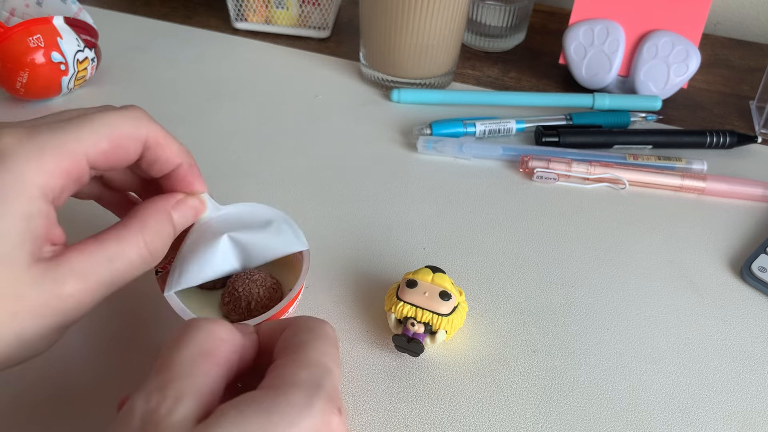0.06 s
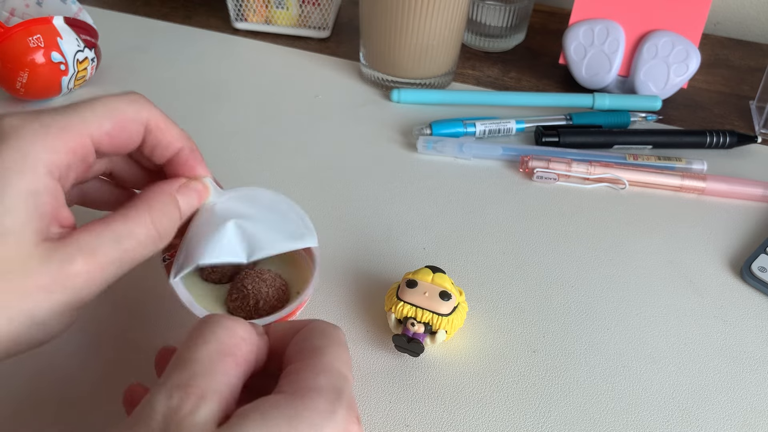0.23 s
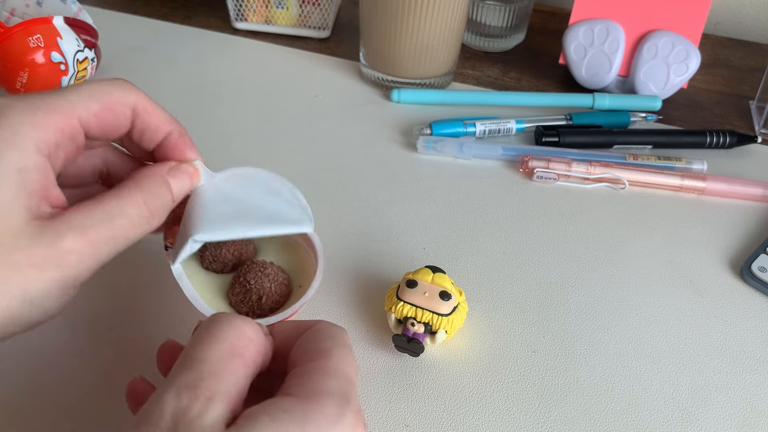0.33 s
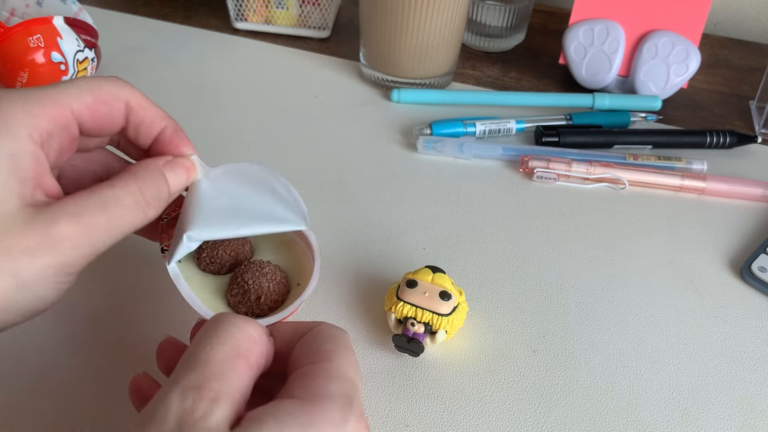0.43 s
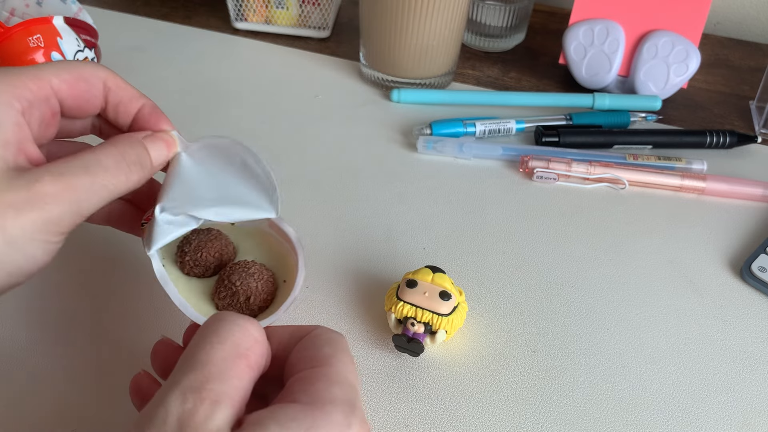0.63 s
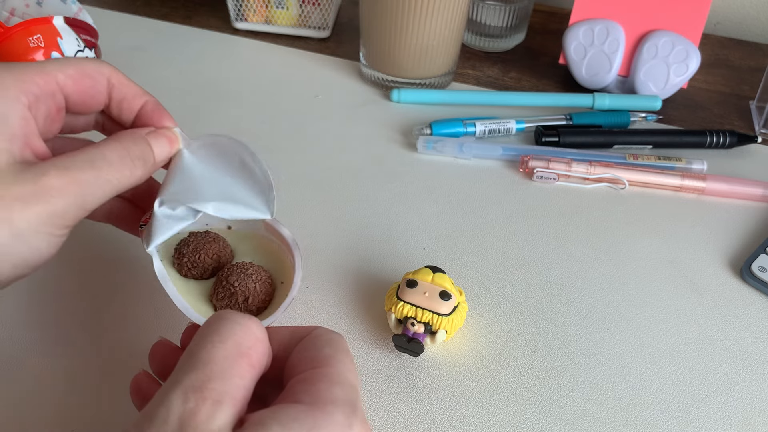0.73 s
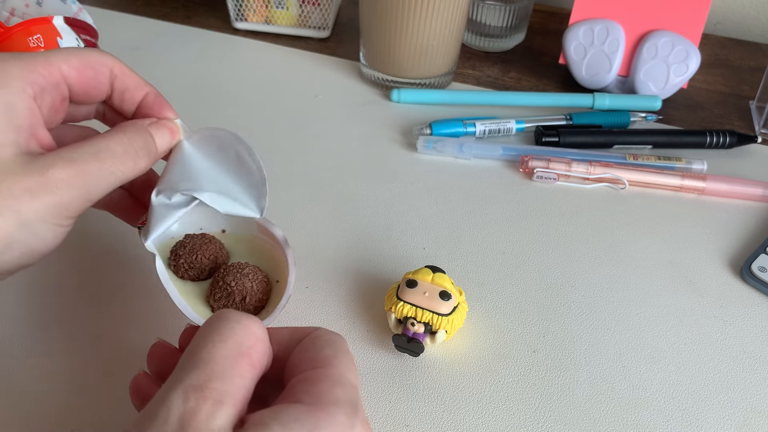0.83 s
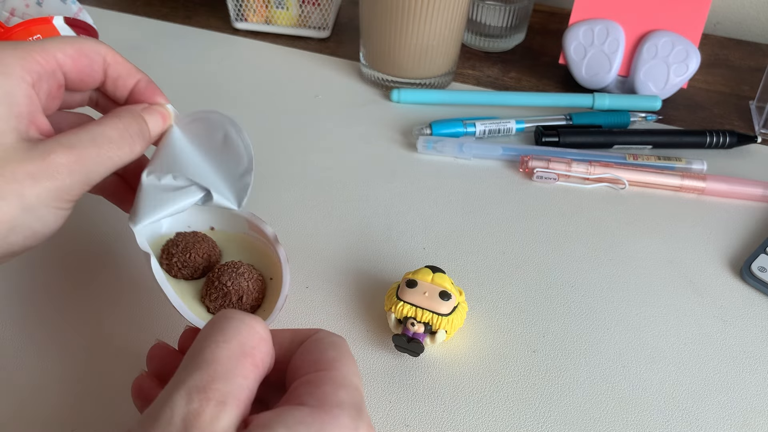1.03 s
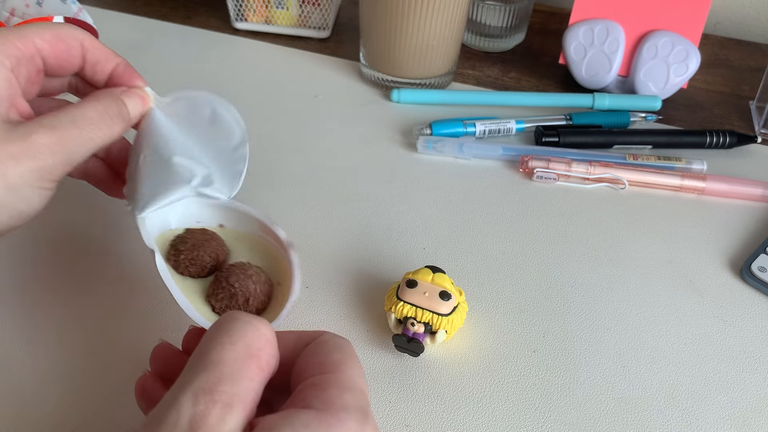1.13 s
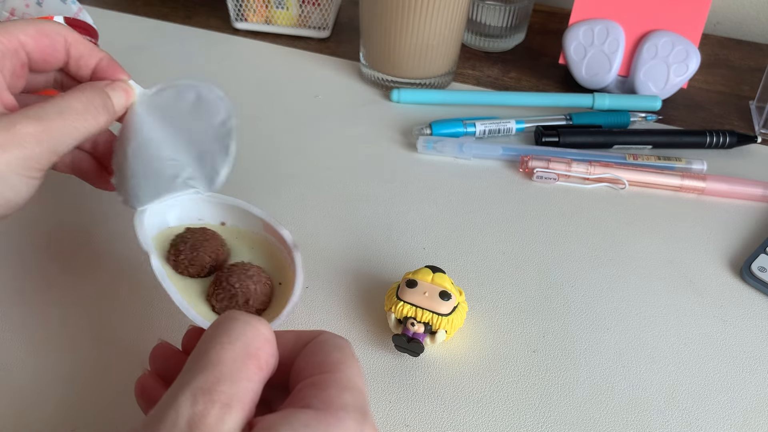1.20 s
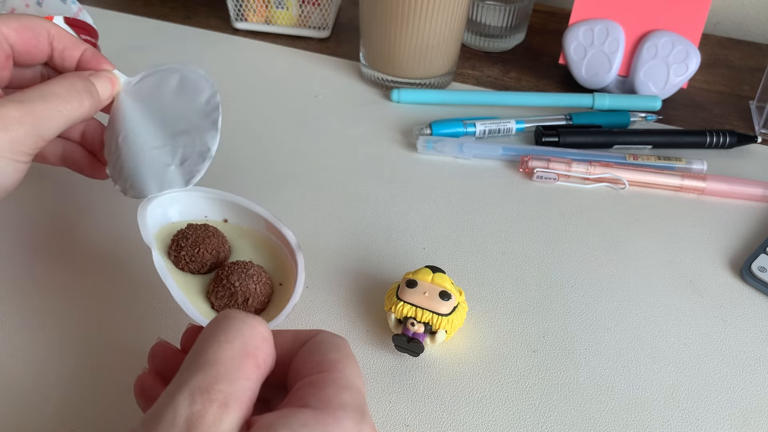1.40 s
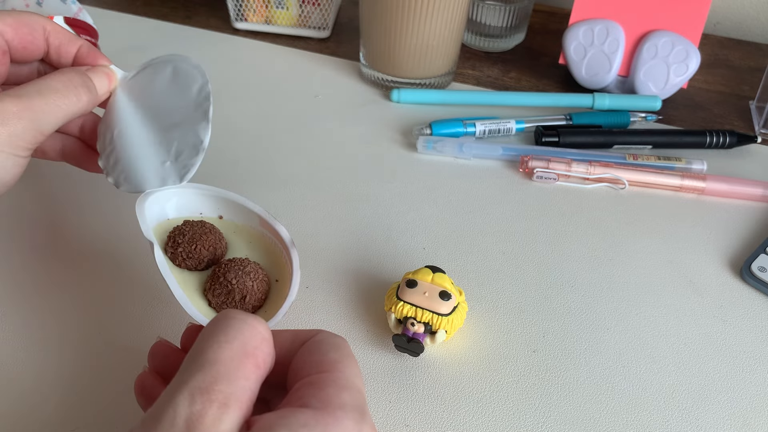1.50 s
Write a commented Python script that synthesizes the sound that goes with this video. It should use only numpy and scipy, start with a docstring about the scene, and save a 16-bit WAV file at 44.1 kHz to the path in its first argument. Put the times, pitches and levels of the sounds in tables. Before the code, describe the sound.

Foil seal being peeled from a little plastic cup, crinkling and popping loudly, close up indoors

```python
"""A foil lid is peeled off a small plastic cup, close by, at a desk in a small room.
The foil buckles in sharp snaps: noise cracks, each with a short shiver, that set the decaying sines of the rim
and of flipping facets ringing. Between them the seal lets go with a fine crackle of random grains, and filtered
noise makes the rub of the fingers and the sliding foil. Echoes and a diffuse tail place it in the room, which
hums quietly, and the loudest snaps overload the microphone."""
import sys
import numpy as np
from scipy import signal
from scipy.io import wavfile
from scipy.ndimage import uniform_filter1d, map_coordinates

SR = 44100
rng = np.random.default_rng(int(sys.argv[2]) if len(sys.argv) > 2 else 0)


def transcribe(u):
    """Save the signal u as a 16-bit wav file named by the first command-line argument.

    u: samples, shape (n,) or (channels, n), limited to [-1, 1]; the rate is SR.
    q: integer samples, one column per channel.
    """
    v = np.clip(np.atleast_2d(u).T, -1, 1)
    q = np.round(v * 32767).astype(np.int16)
    wavfile.write(sys.argv[1], SR, q)


N = 68355
TIME = np.arange(N) / SR
# analysis bands, evenly spaced in log frequency: low_hz, centre_hz, high_hz
EDGES = np.geomspace(22, 17000, 25)
BANDS = list(zip(EDGES, np.sqrt(EDGES[1:] * EDGES[:-1]), EDGES[1:]))


def from_db(db):
    """Decibel law: 20 dB is a factor of ten in amplitude."""
    return 10 ** (np.asarray(db) / 20)


def rms_one(x):
    """Power normalisation: scale to rms 1."""
    return x / np.sqrt(np.mean(x ** 2) + 1e-20)


def unit_energy(x):
    """Energy normalisation: scale each channel to the energy of a unit click."""
    return x / np.sqrt(np.sum(x ** 2, axis=-1, keepdims=True) + 1e-20)


def at_hz(points, hz, column=1):
    """Logarithmic pitch scale: interpolate a table column along log frequency."""
    rows = np.array(points)
    return np.interp(np.log(hz), np.log(rows[:, 0]), rows[:, column])


def level(curve):
    """Amplitude envelope: gain over time from points of time_s, level_db."""
    return from_db(np.interp(TIME, *np.transpose(curve)))


def band(x, low, high):
    """Causal band-pass filtering."""
    sos = signal.butter(2, [low, high], "band", fs=SR, output="sos")
    return signal.sosfilt(sos, x + 1e-18)


def pair(two, likeness):
    """Interchannel correlation: mix two unrelated signals to a left and right of given likeness."""
    c = np.clip(likeness, -1, 1)
    mid = np.sqrt((1 + c) / 2) * two[0]
    side = np.sqrt((1 - c) / 2) * two[1]
    return np.array([mid + side, mid - side])


def pan(db):
    """Interaural level difference: gains for a left channel db above the right."""
    return from_db(np.array([[db / 2], [-db / 2]]))


def late(x, s):
    """Propagation delay: shift by a time in seconds, to a fraction of a sample."""
    return map_coordinates(x, [(TIME - s) * SR], order=3)


def drift(rate):
    """Random modulation: a smooth curve through rate random knots per second, of spread about 1."""
    knots = rng.standard_normal(200)
    return map_coordinates(knots, [TIME * rate], order=3, mode="wrap")


def add(out, sound, s):
    """Superposition: mix a sound in from a time in seconds."""
    i = max(int(s * SR), 0)
    out[..., i:i + sound.shape[-1]] += sound[..., :N - i]


def ring(hz, t60):
    """Damped free vibration: a sine that falls 60 dB in t60 seconds."""
    return np.sin(2 * np.pi * hz * TIME) * from_db(-60 * TIME / t60)


def coloured(sources, colour, likeness):
    """Subtractive synthesis: stereo noise of rms 1, shaped band by band."""
    total = 0
    for k, (low, hz, high) in enumerate(BANDS):
        if high > colour[0][0]:
            # neighbouring bands take unrelated sources
            stereo = pair(band(sources[k % 2], low, high), at_hz(likeness, hz))
            total = total + from_db(at_hz(colour, hz)) * stereo
    return rms_one(total)


# spectrum of the room air: pitch_hz, relative level_db
AIR = [(30, -37), (60, -12), (90, -10.5), (140, -3.5), (200, -12.5), (310, -8), (550, -20), (800, -20),
       (1600, -40), (4000, -33), (9000, -39), (16000, -73)]
# left-right correlation of diffuse noise: pitch_hz, likeness (no unit)
AIR_LIKENESS = [(50, 0.79), (130, 0.63), (400, 0.31), (1200, 0.067), (8000, 0.063)]
# spectrum of the rumble: pitch_hz, relative level_db
RUMBLE = [(25, -32), (38, -11), (52, 3), (75, -2.5), (120, -21), (300, -51)]
# low and upper hum tones: pitch_hz, level_db, waver_db
HUM = [(52, -38, 2.5), (98.7, -46, 0)]
# swell and sinking of the rumble and the low hum: time_s, gain_db
DRONE = [(0, 7), (.12, -9.5), (.25, -3), (.37, 3), (.47, -18.5), (.57, -1.5), (.65, -10), (.75, 2.5),
         (.88, -2.5), (.96, -8), (1.06, 1), (1.2, 1.5), (1.3, 7.5), (1.38, 1), (1.55, 1.5)]
AIR_DB, RUMBLE_DB, HUM_WANDER_HZ = -40.5, -42, 2.37


def background():
    """Stationary noise and modulated tones: room air, with a low hum and rumble that swell and sink."""
    air = from_db(AIR_DB) * coloured(rng.standard_normal((2, 2, N)), AIR, AIR_LIKENESS)
    rumble = from_db(RUMBLE_DB) * coloured(rng.standard_normal((2, 2, N)), RUMBLE, AIR_LIKENESS)
    tones = []
    for hz, db, waver_db in HUM:
        gain = from_db(db + waver_db * drift(9.3))
        phase = 2 * np.pi * np.cumsum(hz + HUM_WANDER_HZ * drift(8)) / SR
        tones.append(gain * np.sqrt(2) * np.sin(phase))
    low_hum, upper_hum = tones
    return air + level(DRONE) * (rumble + low_hum) + upper_hum


# fingers rubbing on the cup and the foil: time_s, level_db
RUB = [(0, -35), (.10, -45), (.2, -43), (.45, -47), (.57, -38.5), (.66, -44), (.78, -42), (.86, -39),
       (.95, -40.5), (1.1, -36.5), (1.3, -46), (1.55, -39)]
# spectrum of the rub: pitch_hz, relative level_db
RUB_COLOUR = [(200, -4.5), (500, 0), (780, 0.5), (1000, 5.5), (1300, -2), (1800, -7.5), (3000, -12),
              (8000, -29)]


def rub():
    """Friction noise: the soft rub of the fingers as enveloped, coloured noise."""
    return level(RUB) * coloured(rng.standard_normal((2, 2, N)), RUB_COLOUR, AIR_LIKENESS)


# the foil slides briefly over the rim: centre_s, length_s, pitch_hz, width_hz, level_db
SLIDES = [(0.565, 0.2, 750, 130, -39), (0.846, 0.14, 1250, 310, -41), (0.918, 0.062, 4200, 690, -38.5),
          (0.013, 0.076, 2800, 730, -44)]
SLIDE_LIKENESS = 0.6


def slides():
    """Resonant friction: short swells of noise, each in one band."""
    out = np.zeros((2, N))
    for centre_s, length_s, hz, width_hz, db in SLIDES:
        swell = np.cos(np.pi * np.clip((TIME - centre_s) / length_s, -.5, .5))
        noise = pair(rng.standard_normal((2, N)), SLIDE_LIKENESS)
        hiss = band(noise, hz - width_hz / 2, hz + width_hz / 2)
        out += from_db(db) * swell * rms_one(hiss)
    return out


# crackle of the seal letting go: time_s, level_db
PEEL = [(0, -37), (.06, -42), (.11, -69), (.16, -47), (.22, -67), (.30, -33.5), (.37, -51), (.45, -44),
        (.51, -38), (.575, -30), (.63, -37), (.70, -53.5), (.80, -43.5), (.92, -37.5), (.99, -39),
        (1.10, -32.5), (1.22, -33), (1.30, -40), (1.36, -75), (1.55, -51.5)]
# spectrum of the crackle: pitch_hz, relative level_db
PEEL_COLOUR = [(500, -3.5), (1200, -17), (2000, 1.5), (3000, 2.5), (4300, -1), (7000, -2), (9000, 2.5),
               (11000, -7), (15000, -11.5)]
GRAINS_PER_S, GRAIN_SPREAD_DB, PEEL_LIKENESS = 3500, 0.5, 0.63


def peel():
    """Granular fracture noise: thousands of tiny breaks of uneven size run along the seal."""
    sizes = from_db(GRAIN_SPREAD_DB * np.minimum(rng.exponential(1, N), 5))
    breaks = rng.random(N) < GRAINS_PER_S / SR
    grains = sizes * breaks * rng.standard_normal((2, 2, N))
    return level(PEEL) * coloured(grains, PEEL_COLOUR, [(1000, PEEL_LIKENESS)])


# modes of the cup's rim: pitch_hz, level_db, t60_s
RIM = [(2360, -25, 0.058), (2458, -15, 0.053), (2619, -8, 0.099), (2674, -21, 0.17), (2810, -16.5, 0.11),
       (3020, -33, 0.15), (4220, -37, .15)]
RIM_PAN_DB, RIM_LAG_S = 0.5, 0.00009  # left above right, right after left


def rim():
    """Modal excitation: each snap sets the rim's damped modes ringing at its own level."""
    modes = sum(from_db(db) * ring(hz, t60) for hz, db, t60 in RIM)
    out = np.zeros(N)
    for s, *_, rim_db in SNAPS:
        add(out, from_db(rim_db) * modes, s)
    return pan(RIM_PAN_DB) * np.array([out, late(out, RIM_LAG_S)])


# a facet of the lid flips and rings briefly: start_s, pitch_hz, level_db, t60_s
POPS = [(0.136, 1190, -19, 0.012), (.2508, 720, -11, 0.027), (0.2529, 523, -18.5, .022),
        (0.3121, 434, -10.5, 0.049), (0.3186, 2830, -6, 0.057), (.3190, 1390, -15.5, 0.033),
        (.5253, 3160, -22.5, 0.02), (0.5823, 3790, -13, 0.017), (0.663, 5170, -22.5, .01),
        (1.0515, 720, -8.5, 0.025), (1.0525, 1136, -18, .025), (1.1245, 1350, -15, 0.037),
        (1.1453, 3320, -13, 0.02), (1.1608, 1369, -15.5, 0.053), (1.1914, 5560, -10, 0.026),
        (1.3035, 1387, -29.5, .035), (1.496, 1414, -35, 0.049)]
POP_PAN_DB = 4.5


def pops():
    """Damped resonance: a flipping facet of the lid rings briefly, and the low ones sound hollow."""
    out = np.zeros(N)
    for s, hz, db, t60 in POPS:
        add(out, from_db(db) * ring(hz, t60), s)
    return out * pan(POP_PAN_DB)


# the foil snaps: start_s, four band levels_db (at the pitches of SNAP_HZ),
# shiver relative to the crack_db, rim ring_db
SNAPS = [(.0482, -12, -9, -4.5, -6.5, -12, -70), (0.1354, -4, 6.5, 8, -3, -5, -60),
         (0.1794, -13, 2.5, 0, -22, 11, -16), (0.2405, -11, 11.5, 10, 15, -3, -1.5),
         (0.2435, -34, 12, 19.5, -9, 18, -11), (.2495, 13, 4, 5, -8, -3, -21),
         (0.3118, 15.5, 19, 15.5, 26.5, -2.5, 0), (0.3163, 8.5, 20.5, 27, 8, 20, -25),
         (0.3231, -11, 13, 19, -17, 13, -2.5), (0.3358, -5, 9, 9, 6, 17, -44),
         (0.5247, 7, 4.5, 2, 11.5, -2.5, -28), (0.5655, 5.5, -13, 3, 2, 0, -60),
         (0.5821, 9, 0, 9.5, 10.5, -1, -50), (0.6637, 3, -2, 5, -2, -2.5, -27.5),
         (0.7744, -7, -11, -10, -7.5, 15, -59), (1.0296, -12, 12, 18.5, 19, -13, -46),
         (1.0509, 7, 20.5, 23.5, 21.5, -3, -41), (1.126, 17.5, 17, 9.5, -1, -4, -12),
         (1.141, -8, -11, 20, -7, 5, -50), (1.1446, 13, 10, 29, 18, -1.5, -31),
         (1.1497, -18, 7, 25.5, 21.5, 0, -35), (1.1610, 10.5, 18.5, 16.5, 10.5, -0.5, -35),
         (1.19, -3, 19, 16.5, 26, -2, -30), (1.1955, 3, -5, 14, 7, 0, -26),
         (1.235, 5, 11.5, 8.5, 26, 14, -17), (1.2494, -11, -13, -4, 13, -2, -63),
         (1.304, 8, 12.5, 4.5, 3, 0.5, -36), (1.4961, 0, 3.5, 2, -48, 20, -31.5)]
# where the four band levels of a snap apply: pitch_hz
SNAP_HZ = (600, 1400, 3500, 9000)
# stereo balance of the snaps: pitch_hz, left minus right_db
BALANCE_DB = [(250, -1), (700, 5.5), (1400, -0.5), (2700, 3.5), (5000, -6), (9000, -1), (15000, -2)]
BASS_DB_PER_OCT, TOP_DB_PER_OCT = -2.5, -15  # slopes below and above SNAP_HZ
CRACK_S, SHIVER_S = 0.00047, 0.0068  # time constants of the decay
SNAP_LIKENESS, SHIVER_LIKENESS = 0.97, 0.56
SHIVER_ROUGH_DB = 5.0
SHIVER_GRAIN_S = 0.0011  # the shiver is a run of tiny after-cracks this long


def snaps():
    """Impulsive buckling: a crack with a sub-millisecond decay and a short shiver, each snap coloured."""
    rows, t = np.array(SNAPS), TIME[:SR // 20]
    # axes: alternate bands, four sources, snaps, time
    white = rng.standard_normal((len(rows), 2, 4, len(t))).transpose(1, 2, 0, 3)
    lumps = uniform_filter1d(rng.standard_normal((len(rows), len(t))), max(int(SHIVER_GRAIN_S * SR), 1))
    ragged = from_db(SHIVER_ROUGH_DB * rms_one(lumps)) * np.exp(-t / SHIVER_S)
    sounds = 0
    for k, (low, hz, high) in enumerate(BANDS):
        if hz < 200:
            continue
        crack = band(pair(white[k % 2, :2], SNAP_LIKENESS) * np.exp(-t / CRACK_S), low, high)
        shiver = band(pair(white[k % 2, 2:], SHIVER_LIKENESS) * ragged, low, high)
        burst = unit_energy(unit_energy(crack) + from_db(rows[:, 5:6]) * unit_energy(shiver))
        db = np.array([np.interp(np.log(hz), np.log(SNAP_HZ), row[1:5]) for row in rows])
        db = db + BASS_DB_PER_OCT * max(np.log2(SNAP_HZ[0] / hz), 0)
        db = db + TOP_DB_PER_OCT * max(np.log2(hz / SNAP_HZ[-1]), 0)
        click_share = np.sqrt(2 * (high - low) / SR)  # a flat click's amplitude in this band
        balance = pan(at_hz(BALANCE_DB, hz))[:, None]
        sounds = sounds + burst * from_db(db)[:, None] * click_share * balance
    out = np.zeros((2, N))
    for k, s in enumerate(rows[:, 0]):
        add(out, sounds[:, k], s)
    return out


# echoes from the desk and the things on it: left delay_s, right delay_s, level_db
ECHOES = [(.0011, .0013, -14.5), (.0027, 0.0021, -17.5), (.0046, .0049, -15)]


def desk(x):
    """Early reflection: a few close, delayed copies."""
    out = 0
    for left_s, right_s, db in ECHOES:
        out = out + from_db(db) * np.array([late(x[0], left_s), late(x[1], right_s)])
    return out


# reverberation of the room: pitch_hz, level_db, t60_s
ROOM = [(242, -2, 0.22), (700, -11.5, 0.31), (1400, -9.5, 0.26), (3080, -8, 0.26), (5454, -10.5, 0.31),
        (8900, -12.5, 0.27), (15000, -13, 0.24)]
ROOM_BUILD_S, ROOM_LIKENESS = 0.002, 0.49


def room(x):
    """Diffuse reverberation: a noise tail that builds up quickly and dies band by band."""
    t = TIME[:SR // 2]
    white = rng.standard_normal((2, 2, len(t)))
    build = 1 - np.exp(-(t / ROOM_BUILD_S) ** 2)
    tail = 0
    for k, (low, hz, high) in enumerate(BANDS):
        decay = np.exp(-np.log(1000) * t / at_hz(ROOM, hz, column=2))
        noise = band(pair(white[k % 2], ROOM_LIKENESS), low, high)
        click_share = np.sqrt(2 * (high - low) / SR)
        tail = tail + from_db(at_hz(ROOM, hz)) * click_share * unit_energy(noise * build * decay)
    return signal.fftconvolve(x, tail, axes=1)[:, :N]


RIGHT_LAG_S = 0.000215


def scene():
    """Interchannel time difference: the sound of the foil reaches the left microphone first."""
    left, right = snaps() + peel()
    foil = np.array([left, late(right, RIGHT_LAG_S)])
    cup = foil + desk(foil) + rim() + pops() + rub() + slides()
    return cup + room(cup) + background()


# treble dips of the microphone: pitch_hz, width_hz, depth (0-1)
MIC_DIPS = [(7450, 2700, 0.26), (11610, 2000, 0.77)]
OVERLOAD, CUTOFF_HZ = 1.0, 15700  # clipping amplitude, low-pass edge


def record(dry):
    """Transducer response and overload: two treble dips, clipped peaks, then a steep low-pass."""
    x = dry
    for hz, width_hz, depth in MIC_DIPS:
        resonance = signal.lfilter(*signal.iirpeak(hz, hz / width_hz, fs=SR), x)
        x = x - np.clip(depth, 0, 1) * resonance
    clipped = np.clip(x, -OVERLOAD, OVERLOAD)
    return signal.sosfilt(signal.ellip(10, .2, 70, CUTOFF_HZ, fs=SR, output="sos"), clipped)


dry = scene()
out = record(dry)
transcribe(out)
```